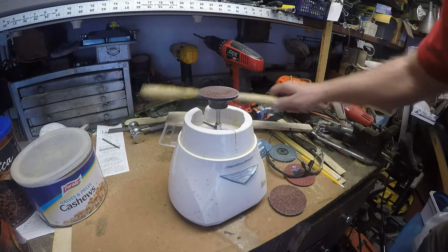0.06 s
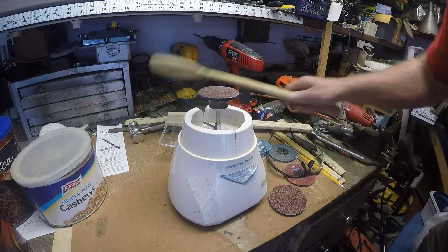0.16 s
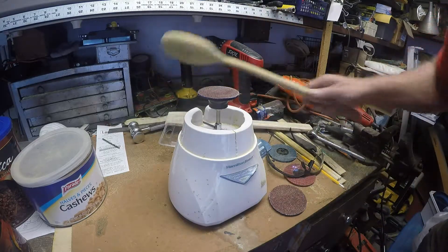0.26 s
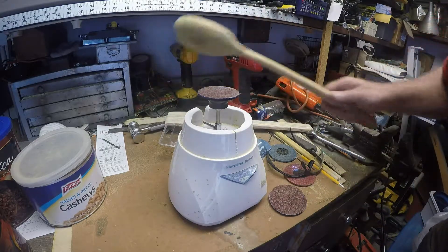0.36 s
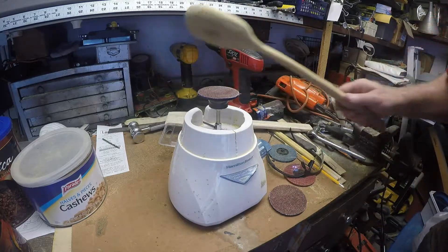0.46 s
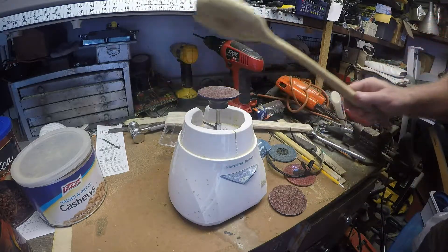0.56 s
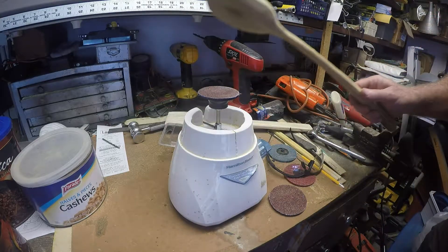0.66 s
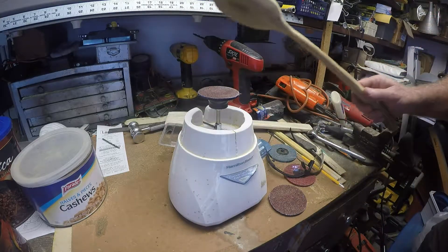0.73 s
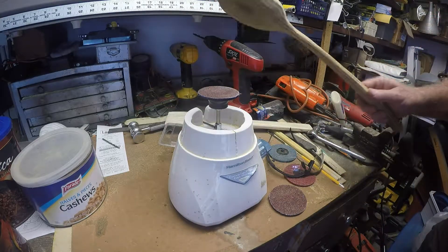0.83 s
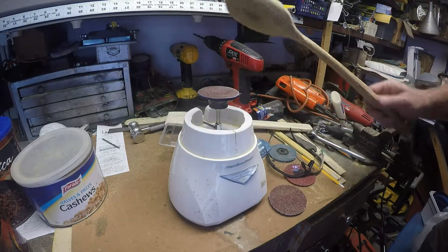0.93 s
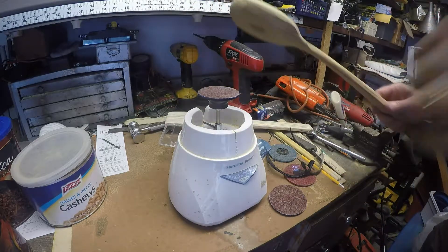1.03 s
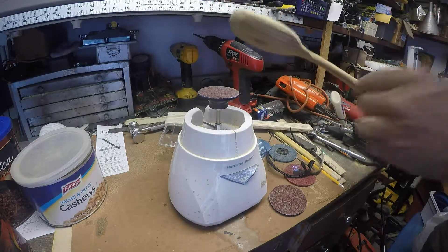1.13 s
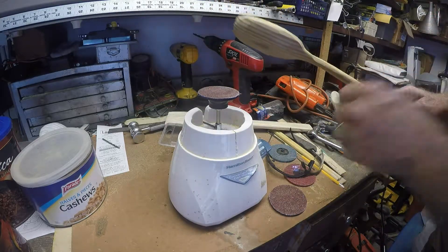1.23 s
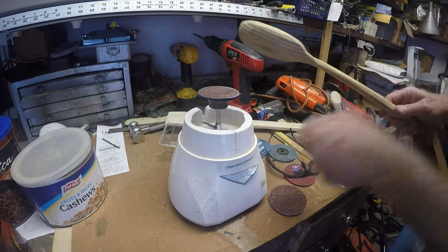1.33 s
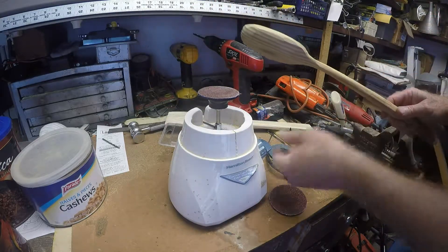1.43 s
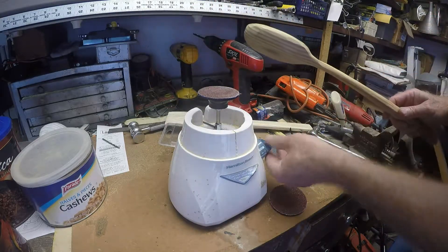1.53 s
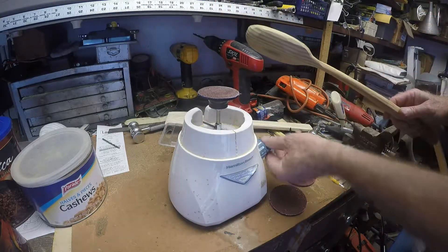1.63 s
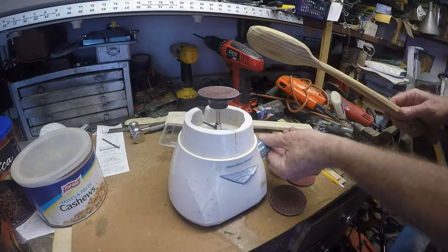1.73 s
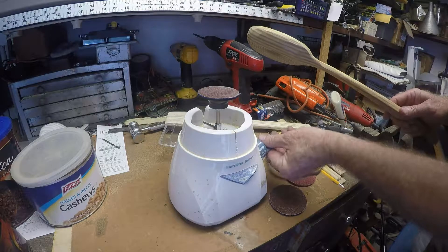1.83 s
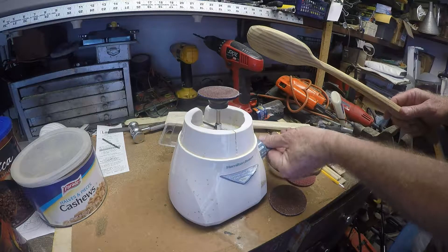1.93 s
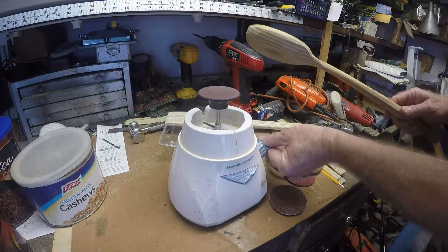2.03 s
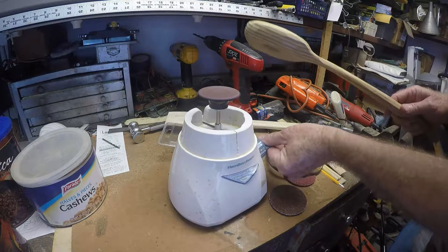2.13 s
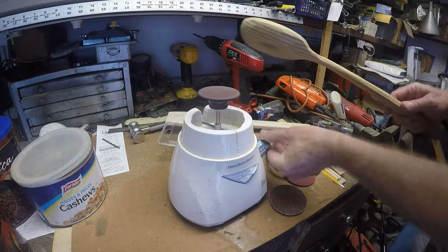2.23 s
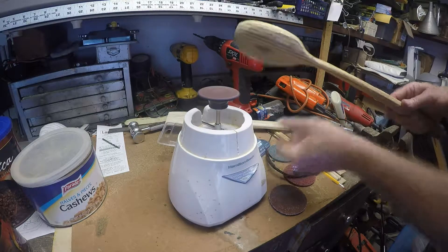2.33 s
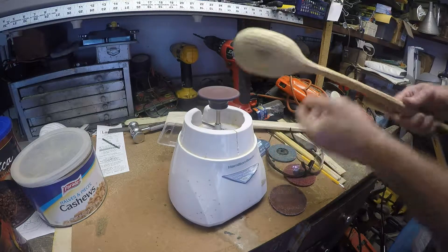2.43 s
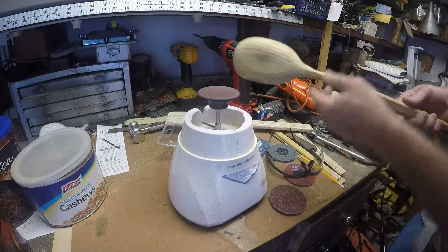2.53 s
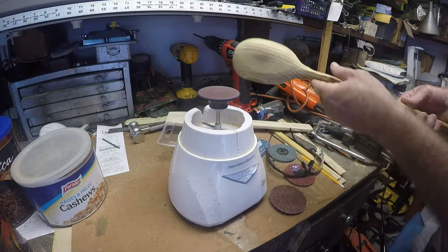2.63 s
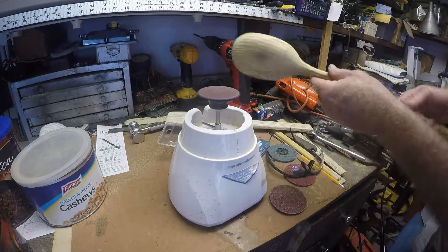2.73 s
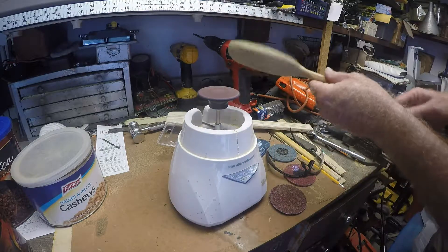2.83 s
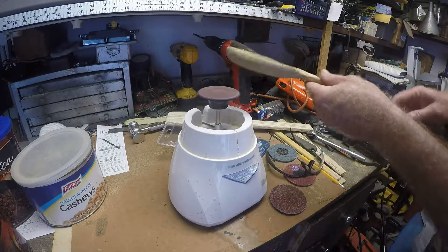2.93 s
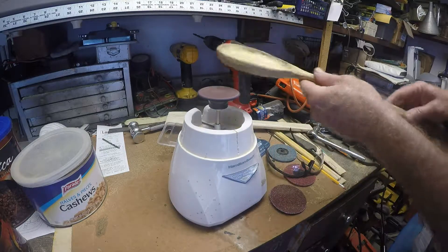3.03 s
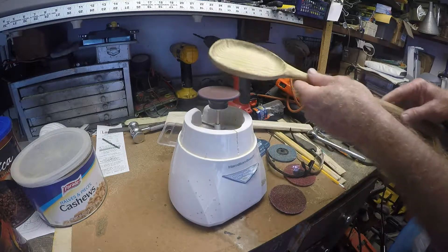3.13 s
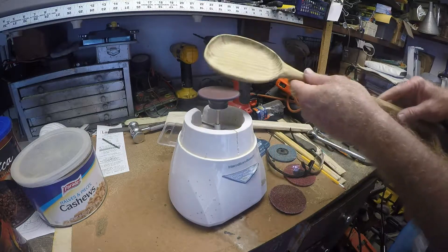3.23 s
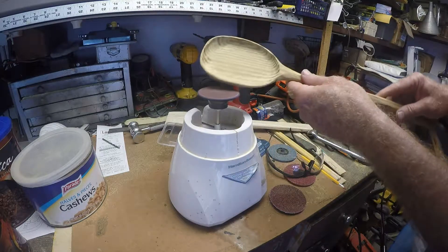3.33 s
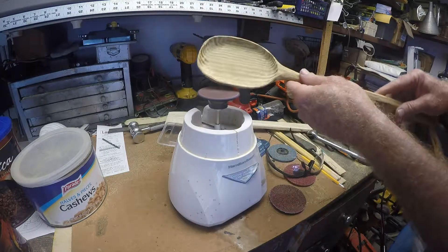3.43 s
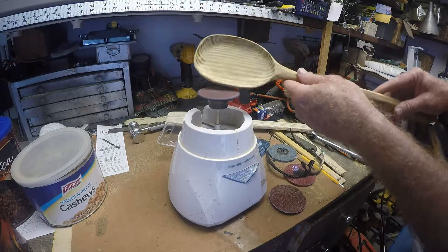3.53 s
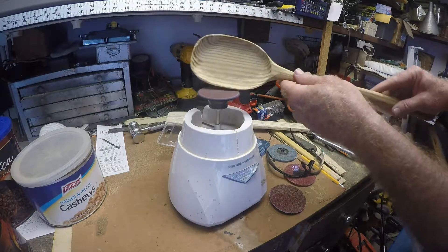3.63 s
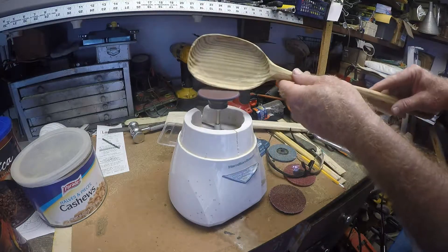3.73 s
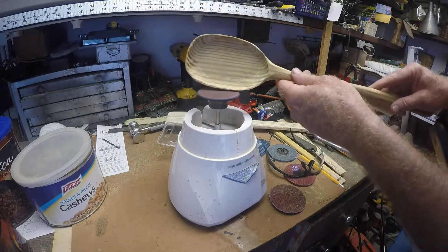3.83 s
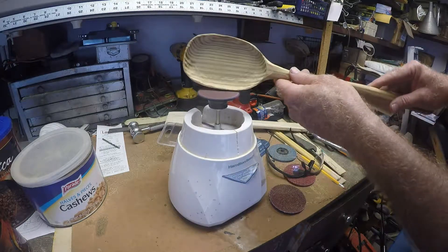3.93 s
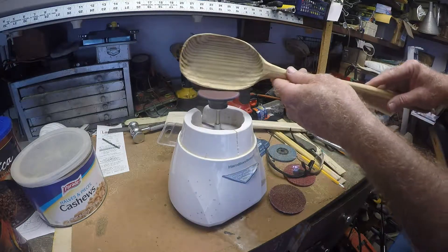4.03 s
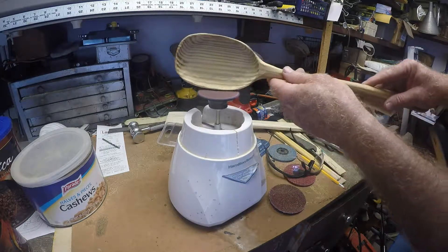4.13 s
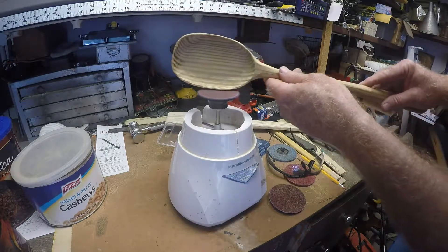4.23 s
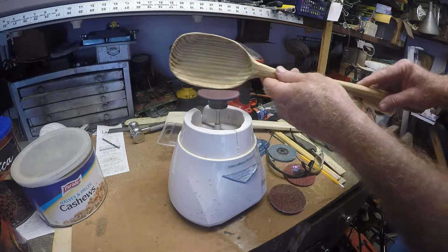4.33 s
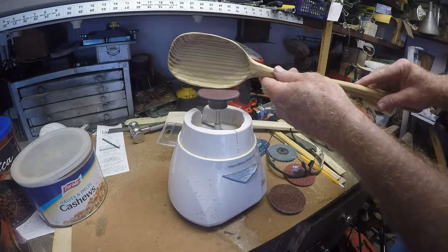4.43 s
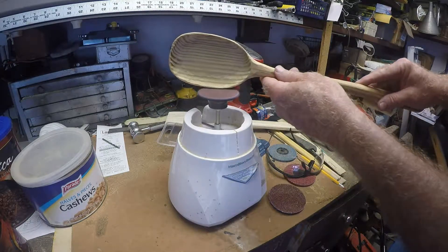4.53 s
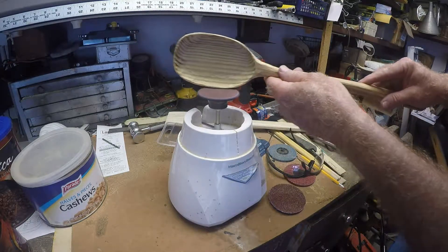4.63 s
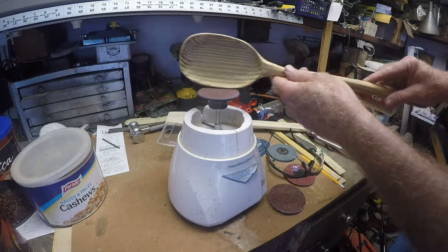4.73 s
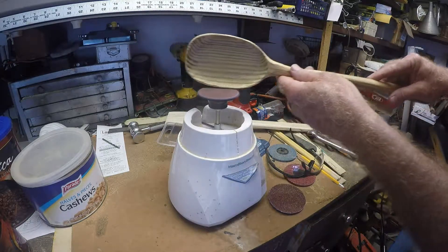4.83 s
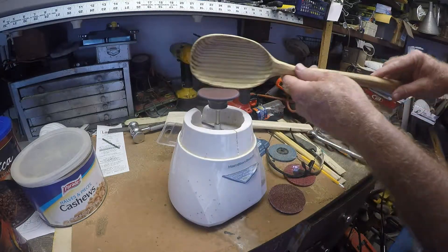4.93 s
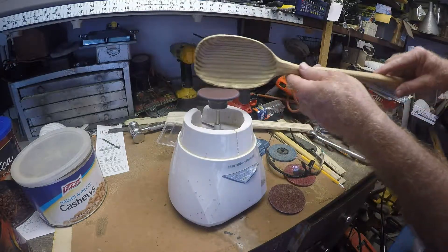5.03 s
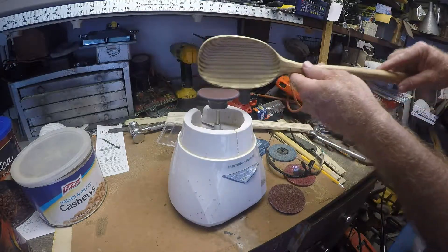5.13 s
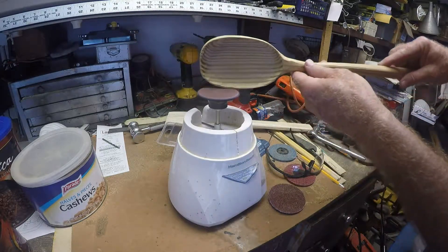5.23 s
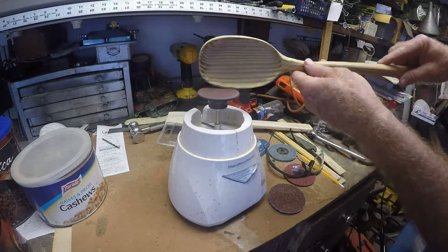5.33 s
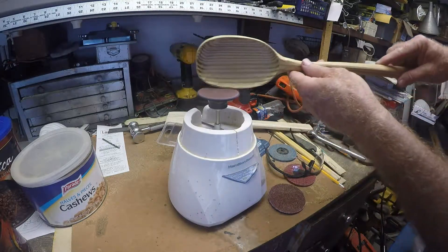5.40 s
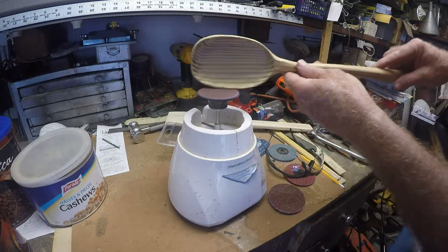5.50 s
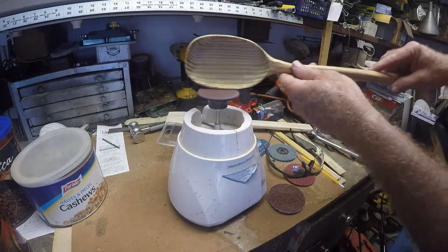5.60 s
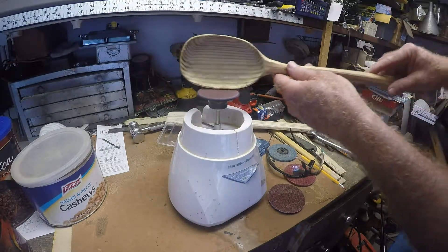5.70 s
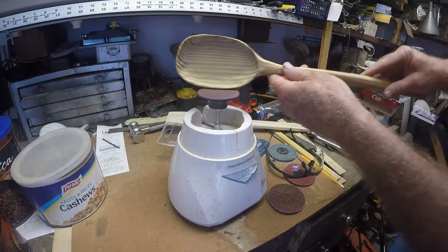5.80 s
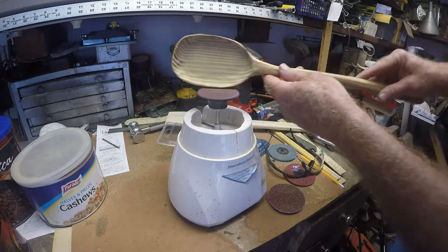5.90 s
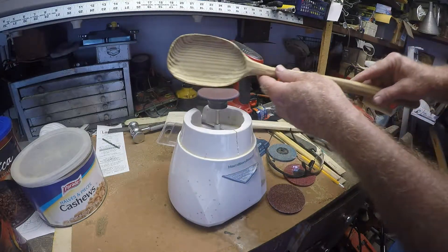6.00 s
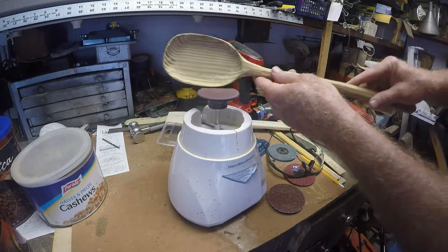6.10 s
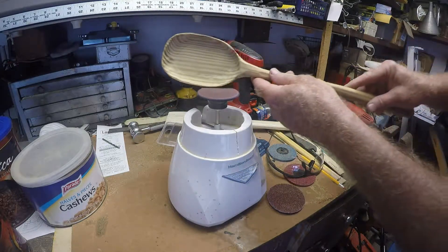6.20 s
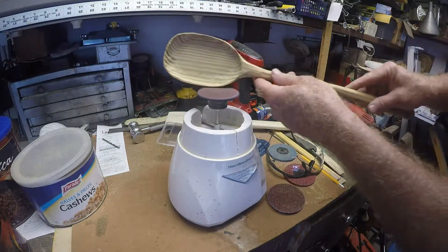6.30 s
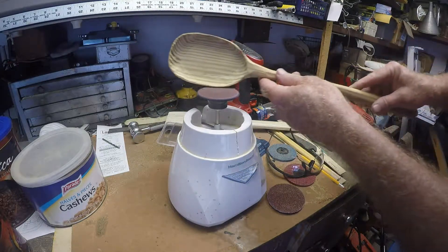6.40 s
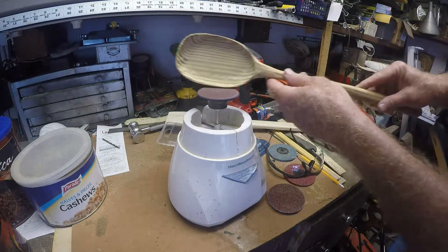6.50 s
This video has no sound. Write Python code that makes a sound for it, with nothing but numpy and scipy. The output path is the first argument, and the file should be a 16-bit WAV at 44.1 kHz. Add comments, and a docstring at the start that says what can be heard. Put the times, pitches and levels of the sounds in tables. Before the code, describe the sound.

A quiet workshop with faint low hum for two seconds. A switch clicks and crackles, and a small brush motor in a hollow plastic base buzzes, knocks on the bench and races up in pitch to a loud steady whir. Later a wooden spoon touches the spinning disc: gritty rasps and hiss in short pushes, fast chattering bounces and thin squeals, over the slightly slowing motor. Close microphone, small cluttered room, continuing to the end.

```python
"""Blender base as a sanding machine

A blender base with a sanding disc on its shaft is switched on in a small, humming workshop.
Its brush motor, fed with half-wave mains, clicks, buzzes and runs up through the resonances of its plastic housing:
tones follow the shaft speed, and shaped noise makes the brushes and the rumble.
A wooden spoon held lightly to the disc rasps with every turn (a repeating track of grit), bounces and squeals."""
import sys
import numpy as np
from scipy import signal
from scipy.fft import rfft, irfft
from scipy.io import wavfile
from scipy.ndimage import map_coordinates

SR = 44100
rng = np.random.default_rng(int(sys.argv[2]) if len(sys.argv) > 2 else 0)


def wrap_up_sound(samples):
    """Save the sound to the file named by the first command line argument, as 16-bit audio."""
    columns = np.atleast_2d(samples).T
    # keep every value between -1 and 1, then stretch to whole-number steps
    tamed = np.clip(columns, -1, 1)
    steps = np.round(tamed * 32767).astype(np.int16)
    wavfile.write(sys.argv[1], SR, steps)


N = 289296   # length in samples
TIME = np.arange(N) / SR   # seconds
MAINS_HZ = 60
CUTOFF_HZ = 15300   # nearly nothing is left above this
SWITCH_ON_S = 1.98

# All levels in the tables are relative, within their own layer.
# Run-up, a quick surge plus a slow creep: (speed gained/turns per s, time constant/s)
RUN_UP = [(77.1, .1425), (130.75, .4125)]
# How hard the spoon brakes the disc: (t/s, speed lost/turns per s)
LOAD = [(3.55, 0), (3.87, 2.1), (4.15, 2.0), (4.4, 2.7), (4.92, 4.7), (5.17, 5.4), (5.39, 3.9), (5.62, 8.4),
        (5.8, 6.6), (5.95, 7.1), (6.08, 6.7), (6.3, 7.7), (6.56, 7.9)]

# Unbalance tones and their mains side tones: (multiple of shaft speed, multiple of mains added, level/dB)
UNBALANCE_TONES = [(1, 0, -18.5), (2, 0, -16), (3, 0, -19.5), (4, 0, -24.5), (5, 0, -34), (6, 0, -30),
                   (1, -1, -35), (1, 1, -30.5), (1, 2, -33), (2, -2, -28.5), (2, -1, -36.5), (2, 1, -26.5)]
# How the base passes the unbalance tones on: (f/Hz, gain/dB)
BASE_RESPONSE = [(60, -1), (100, 2.5), (120, 1.5), (138, -6.5), (185, -7.5), (205, -9), (255, -3.5),
                 (295, -19.5), (335, 2), (365, 6), (390, 0), (408, -6.5), (500, -11.5), (610, -15.5),
                 (700, -19), (820, -15)]
# Whine of fan blades, slots and commutator: (multiple of shaft speed, level/dB)
WHINE_TONES = [(10, -31.5), (20, -36), (24, -37), (36, -41), (48, -42)]
# How the plastic shell passes the whine on: (f/Hz, gain/dB)
SHELL_RESPONSE = [(1400, -14), (1800, -12), (1950, -6), (2050, 1), (2300, -32), (3900, -10), (4300, 2),
                  (4600, 0), (4800, 2), (4950, -2), (5700, -1), (6100, 4), (6600, -2), (7050, -3.5),
                  (7350, -13), (7700, -8), (9000, -18)]
SHAFT_JITTER_TURNS = .0033   # typical size of the uneven turning
STEADYING_DB = -.5   # the spoon's weight calms the once-a-turn wobble: dB per turn per s lost

# Partials of the buzzing iron: (multiple of mains, level/dB)
BUZZ_PARTIALS = [(1, -19), (2, -11), (3, -15), (6, -14)]
# Buzz gain of the starting current, the power by which it fades, its build-up
BUZZ_DB, BUZZ_POWER, BUZZ_ATTACK_S = -14, 1.12, 0.057
BUZZ_LOAD_DB = -49.5   # buzz gain for each turn per s lost to the spoon

# Colour of the brush noise: (f/Hz, density/dB)
BRUSH_COLOUR = [(500, -14), (750, -13), (1100, -8), (1600, -1.5), (2150, 1.5), (2520, 0), (3050, 0),
                (3300, -2), (3800, 0), (4100, -5), (4700, 0.5), (5300, -8.5), (6200, -6.5), (8000, -19),
                (10000, -22.5), (15000, -26)]
# Shell modes that the brushes set ringing: (f/Hz, width/Hz, level/dB)
BRUSH_MODES = [(1988, 120, -15), (2890, 210, -10)]
# Brushes and cooling air: gain at rest and at full speed, and the power of speed by which it grows
BRUSH_STALL_DB, BRUSH_DB, BRUSH_POWER = -44, -23, 1.93
BRUSH_FLUTTER_DB = 3   # how much each mode flutters

# Colour of the housing's rumble: (f/Hz, density/dB)
RUMBLE_COLOUR = [(25, -22), (60, -13), (135, -15), (190, -12.5), (240, -8), (310, -9), (350, 3), (375, 4.5),
                 (430, -10), (485, -2), (560, -15), (800, -18.5), (1800, -24)]
# Rumble gain without rocking or load, its growth as a power of speed, and dB per turn per s lost
RUMBLE_DB, RUMBLE_POWER, RUMBLE_LOAD_DB = -28, 0.2, 0.2
# The base rocks on its feet near one shaft speed: turns per s, half width of the peak, extra gain
ROCKING_HZ, ROCKING_WIDTH_HZ, ROCKING_DB = 143.5, 14.4, 11.5

# Switch contacts and first sparks: (t/s, level/dB)
CLICKS = [(1.993, -28), (2.011, -18), (2.027, -14.5), (2.044, -20), (2.063, -18), (2.112, -25),
          (2.128, -19.5)]
# Modes of the plastic shell that ring with the clicks: (f/Hz, width/Hz, level/dB)
CLICK_MODES = [(1110, 320, -0.5), (1830, 100, 5), (2720, 360, 0.5), (3730, 290, -0.5), (4700, 360, -0.5)]
# The base knocks on the bench while the rotor gathers speed: (t/s, level/dB)
KNOCKS = [(2.141, -8.5), (2.19, -15), (2.318, -18)]
# Modes of the bench that ring with the knocks: (f/Hz, width/Hz, level/dB)
KNOCK_MODES = [(470, 63, 1), (650, 82, 3), (905, 120, -6), (1054, 36, -2), (1800, 160, -2)]

# Pushes of the spoon onto the disc: (start t/s, rise/s, length/s, bite level/dB)
STROKES = [(3.621, .026, .049, -38.5), (3.716, .048, 0.16, -34.5), (3.863, .049, 0.21, -40),
           (4.037, .079, 0.086, -39), (4.263, 0.094, 0.14, -37), (4.397, .03, 0.25, -39),
           (4.684, 0.044, 0.22, -37), (4.9, 0.071, 0.24, -39.5), (5.319, 0.17, 0.31, -33),
           (5.71, .04, 0.25, -43.5), (5.903, 0.22, 0.48, -43.5), (6.48, .075, .1, -38.5)]
RELEASE_S, RESTING_DB = 0.039, -44.5   # between strokes the bite dies back to that of the resting spoon
# Colour of the wood's rasp: (f/Hz, density/dB)
RASP_COLOUR = [(900, -30), (1500, 4.5), (2600, -23), (3550, 9), (4200, -2.5), (4900, 1), (5550, 4),
               (6250, 5), (6800, -9), (7300, -0.5), (8600, -8.5), (11000, -37)]
# Colour of the grit's hiss: (f/Hz, density/dB)
GRIT_COLOUR = [(5000, -2), (6850, 5), (8200, 3.5), (9100, 5), (9700, 6.5), (10700, -1), (11700, 6.5),
               (12300, 4), (13100, -1), (14000, 5), (15400, -5)]
# Spots of wood that each ring at their own pitch: (middle t/s, length/s, f/Hz, level/dB)
WOOD_RINGS = [(3.67, 0.08, 5000, -26), (3.83, .12, 13800, -40), (4.03, 0.2, 7700, -39),
              (4.09, 0.15, 9830, -38), (4.4, .18, 13650, -41), (4.36, .09, 8500, -38),
              (4.75, 0.078, 6150, -27), (4.83, 0.19, 4400, -30), (4.85, 0.2, 8000, -37),
              (4.84, 0.15, 12000, -40), (5.08, .17, 7650, -43), (5.6, .22, 14000, -38.5),
              (5.57, .1, 5100, -29), (5.53, .15, 7400, -32), (5.55, 0.1, 12850, -32),
              (6.16, 0.37, 12160, -40.5), (6.13, 0.24, 14600, -36.5)]
RING_WIDTH_SHARE = .075   # width of each filter as a share of the ring's pitch
SNAGS_PER_S = 65   # coarse grains that catch in the wood

# Bouts of bouncing: (start t/s, length/s, first rate/hops per s, last rate/hops per s, level/dB)
BOUTS = [(4.316, 0.8, 19.1, 21.4, -26), (5.399, 0.28, 31, 37, -24), (5.719, 0.92, 24.4, 16.4, -27)]
# Modes of the spoon: (f/Hz, width/Hz, level/dB)
SPOON_MODES = [(375, 17, -42), (886, 91, -4), (1090, 126, -3.5), (1500, 37, -26), (1690, 43, 2)]
# A scuff's decay as a share of its hop; rattle between landings; the dying away of a bout
HOP_DECAY, RATTLE_SHARE, BOUT_RELEASE_S = 0.27, 0.077, 0.062

# Squeals of a brush (first row), then of the wood: (middle t/s, length/s, multiple of shaft speed, level/dB)
SQUEALS = [(2.356, .02, 36, -32), (3.86, .13, 31, -32), (4.45, .14, 17, -31), (4.65, .9, 8, -38),
           (4.827, .12, 23, -31), (4.93, .42, 24, -27), (4.86, .2, 18, -31), (5.53, .2, 5, -33.5),
           (5.5, .12, 24, -27), (5.58, .1, 25, -28), (5.64, .36, 18, -28.5), (6.15, .56, 24, -27.7),
           (6.17, .29, 21, -25.5), (6.36, .14, 31, -33)]

# Steady hum in the workshop: (f/Hz, level/dB)
HUM = [(75.4, -40.5), (150.7, -54.5), (226.1, -50), (301.5, -62), (452.2, -47.5), (678.3, -60)]
# Colour of the room noise: (f/Hz, density/dB)
ROOM_COLOUR = [(12, -36), (20, -2.5), (49, -12.5), (80, -1.5), (97, -11.5), (155, -8), (183, -13.5),
               (229, -9.5), (398, -12), (457, -11.5), (555, -17.5), (603, -16), (774, -22), (1300, -24.5),
               (2000, -27), (2800, -29.5), (3600, -35), (5100, -35), (6600, -39.5), (9000, -50),
               (15000, -59)]
ROOM_DB = -41


def shaft_speed(load):
    """Turns per second: the motor closes in on its free speed, less what the spoon takes."""
    age = np.maximum(TIME - SWITCH_ON_S, 0)
    return sum(gain * (1 - np.exp(-age / lag_s)) for gain, lag_s in RUN_UP) - load


def rotor(speed, spin, turns, load):
    """Shaft tones grow with speed and swell as they cross the resonances of base and shell."""
    late_speed = np.interp(TIME - .025, TIME, speed)   # resonances take a moment to build up
    low = 0
    for multiple, side, db in UNBALANCE_TONES:
        side_hz = side * MAINS_HZ
        steadying_db = (multiple == 1) * STEADYING_DB * load
        gain = from_db(db + .5 * drift(15) + steadying_db) * spin ** (0.43 * multiple)
        passed_on = response(BASE_RESPONSE, multiple * late_speed + side_hz)
        low = low + gain * passed_on * tone(multiple * turns + side_hz * TIME)
    jitter = SHAFT_JITTER_TURNS * drift(29)   # uneven turning blurs the high partials
    high = 0
    for multiple, db in WHINE_TONES:
        gain = from_db(db + 2.15 * drift(9.4)) * response(SHELL_RESPONSE, multiple * speed)
        high = high + gain * tone(multiple * (turns + jitter))
    high = high * from_db(1.3 * drift(56))   # the brushes grip unevenly
    onset = np.clip(speed / 115, 0, 1) ** 4   # a slow rotor hardly shakes anything
    return onset * (low + high * throb(MAINS_HZ * TIME, depth=0.054))


def windings(spin, load):
    """The iron buzzes with the current, which falls as the rotor gains speed and returns under load."""
    build_up = np.clip((TIME - SWITCH_ON_S) / BUZZ_ATTACK_S, 0, 1)
    inrush = build_up * np.maximum(1 - spin, 0) ** BUZZ_POWER
    buzz = sum(from_db(db + 0.5 * drift(22)) * tone(k * MAINS_HZ * TIME) for k, db in BUZZ_PARTIALS)
    return (from_db(BUZZ_DB) * inrush + from_db(BUZZ_LOAD_DB) * load) * buzz


def brushes(spin, turns):
    """Brushes scratch on the commutator, louder with speed; the shell rings fitfully with them."""
    sparks = noise() * from_db(1.5 * drift(1400) + 0.96 * drift(62))
    # uneven over the turn and over the mains cycle
    sparks = sparks * throb(3 * turns, depth=0.15) * throb(MAINS_HZ * TIME, depth=0.033)
    rings = 0
    for hz, width_hz, db in BRUSH_MODES:
        flutter = from_db(db + BRUSH_FLUTTER_DB * drift(35))
        rings = rings + flutter * rms_one(resonance(sparks, hz, width_hz))
    gain = np.hypot(from_db(BRUSH_STALL_DB), from_db(BRUSH_DB) * spin ** BRUSH_POWER)
    running = TIME > CLICKS[0][0]
    return gain * running * (coloured(sparks, BRUSH_COLOUR) + rings)


def housing(speed, spin, load):
    """The hollow base rumbles on its feet, most while the shaft passes their resonance."""
    rocking_db = ROCKING_DB / (1 + ((speed - ROCKING_HZ) / ROCKING_WIDTH_HZ) ** 2)
    gain = from_db(RUMBLE_DB + rocking_db + RUMBLE_LOAD_DB * load) * spin ** RUMBLE_POWER
    running = TIME > CLICKS[0][0]
    return gain * running * coloured(noise(), RUMBLE_COLOUR)


def clicks():
    """The switch cracks in the shell, and the base knocks on its rubber feet, ringing the bench."""
    contacts = softened(blows(CLICKS, chatter=0.21, decay_s=0.0054), cut_hz=8200)
    thuds = softened(blows(KNOCKS, chatter=0.042, decay_s=0.01), cut_hz=1700)
    return from_db(17.5) * body(contacts, CLICK_MODES) + from_db(29.0) * body(thuds, KNOCK_MODES)


def sanding(turns):
    """The disc, slightly out of true, bites once a turn; wood rasps and rings, grit hisses and snags."""
    contact = throb(turns, depth=0.24) * throb(2 * turns, depth=0.13)
    snags = rms_one((rng.random(N) < SNAGS_PER_S / SR) * rng.uniform(.5, 1, N))
    scrape = contact * grit_track(turns, memory_turns=43, loose=0.89) + 0.2 * snags
    grit = contact * grit_track(turns, memory_turns=10, loose=0.5)
    grit = grit * from_db(1.5 * drift(1500)) + 0.25 * snags
    bite = from_db(RESTING_DB) * (TIME > STROKES[0][0])
    for start_s, rise_s, length_s, db in STROKES:
        bite = np.hypot(bite, from_db(db) * swell(start_s, rise_s, length_s, RELEASE_S))
    rings = 0
    for middle_s, length_s, hz, db in WOOD_RINGS:
        width_hz = hz * RING_WIDTH_SHARE
        ring = resonance(resonance(grit, hz, width_hz), hz, width_hz)
        rings = rings + from_db(db) * arch(middle_s, length_s) * rms_one(ring)
    rasp = from_db(5.5) * bite ** 0.84 * coloured(scrape, RASP_COLOUR)
    hiss = from_db(3.5) * bite * coloured(grit, GRIT_COLOUR)
    return (rasp + rings + hiss) * from_db(1.06 * drift(60))


def grit_track(turns, memory_turns, loose, size=220):
    """The same ring of grains passes under the wood every turn and slowly changes as the spoon moves."""
    shape = (int(turns[-1]) + 2, size)   # one row of grains for each turn
    keep = np.exp(-1 / memory_turns)
    ring = signal.lfilter([1], [1, -keep], rng.standard_normal(shape), axis=0)
    passing = rms_one(map_coordinates(ring.ravel(), [turns * size], order=3))
    return passing + loose * noise()   # torn fibres and dust never repeat


def bouncing(turns):
    """The spoon hops on the disc in bouts; each landing is a short scuff of grit that rings its modes."""
    landings = 0
    for start_s, length_s, first_rate, last_rate, db in BOUTS:
        rate = np.interp(TIME, [start_s, start_s + length_s], [first_rate, last_rate])
        rate = rate * from_db(0.17 * drift(3.8))
        hops = np.cumsum(rate * (TIME > start_s)) / SR
        scuffs = RATTLE_SHARE + np.exp(-(hops % 1) / HOP_DECAY)
        bout = swell(start_s, 0.0054, length_s, BOUT_RELEASE_S)
        landings = landings + from_db(db) * bout * scuffs
    scuffed_grit = landings * grit_track(turns, memory_turns=2.5, loose=1.0)
    return from_db(17.5) * body(scuffed_grit, SPOON_MODES)


def squeal(turns):
    """Stick and slip lock briefly to multiples of the shaft speed, with a fine tremble."""
    out = np.zeros(N)
    for middle_s, length_s, multiple, db in SQUEALS:
        line = from_db(2.3 * drift(35)) * tone(multiple * turns + .06 * drift(22))
        out += from_db(db) * arch(middle_s, length_s) * line
    return out


def workshop():
    """Room noise and the hum of a fan somewhere, made of slightly wavering tones."""
    hum = 0
    for hz, db in HUM:
        hum = hum + from_db(db + 2.8 * drift(33)) * tone(hz * TIME + 0.0092 * drift(3.6))
    return hum + from_db(ROOM_DB) * coloured(noise(), ROOM_COLOUR)


def blows(rows, chatter, decay_s):
    """Each blow is one sharp contact and a short burst of chatter after it."""
    out = np.zeros(N)
    for start_s, db in rows:
        age = np.maximum(TIME - start_s, 0)
        out += from_db(db) * chatter * noise() * (age > 0) * np.exp(-age / decay_s)
        out[int(start_s * SR)] += from_db(db)
    return out


def softened(x, cut_hz):
    """A yielding contact has little treble."""
    return signal.sosfilt(signal.butter(2, cut_hz, fs=SR, output="sos"), x + 1e-18)


def body(x, modes):
    """A struck object rings at several pitches: parallel resonances with alternating signs."""
    out = 0
    for k, (hz, width_hz, db) in enumerate(modes):
        out = out + (-1) ** k * from_db(db) * resonance(x, hz, width_hz)
    return out


def resonance(x, hz, width_hz):
    """Two-pole band-pass with gain near 1 on top; a narrow one rings longer."""
    r = np.exp(-np.pi * width_hz / SR)
    feed = np.array([1, 0, -1]) * (1 - r * r) / 2
    feedback = [1, -2 * r * np.cos(2 * np.pi * hz / SR), r * r]
    return signal.lfilter(feed, feedback, x + 1e-18)


def swell(start_s, rise_s, length_s, release_s):
    """A smooth rise, a hold, and an exponential release."""
    age = TIME - start_s
    rise = np.sin(np.pi / 2 * np.clip(age / rise_s, 0, 1)) ** 2
    return rise * np.exp(-np.maximum(age - length_s, 0) / release_s)


def arch(middle_s, length_s):
    """A rounded rise and fall."""
    return np.exp(-np.abs(2 * (TIME - middle_s) / length_s) ** 3 / 2)


def throb(cycles, depth):
    """A swell once a cycle; unit power."""
    return rms_one(np.exp(depth * np.cos(2 * np.pi * cycles)))


def tone(cycles):
    """A sine of unit power that starts anywhere in its cycle."""
    return np.sqrt(2) * np.sin(2 * np.pi * (cycles + rng.random()))


def noise():
    """White noise."""
    return rng.standard_normal(N)


def drift(rate_hz):
    """Random wandering of spread 1, mostly slower than the given rate."""
    hz = np.arange(N // 2 + 1) * SR / N
    return rms_one(irfft(rfft(noise()) / (1 + (hz / rate_hz) ** 2), N))


def coloured(x, points):
    """A steady sound given a spectrum that falls steeply beyond its ends; unit power."""
    hz = np.maximum(np.arange(N // 2 + 1) * SR / N, 1)
    skirts = np.minimum(1, np.minimum(hz / points[0][0], points[-1][0] / hz)) ** 3
    return rms_one(irfft(rfft(x) * response(points, hz) * skirts, N))


def response(points, hz):
    """Gain of a spectrum at the given frequencies, joined by straight lines over log frequency."""
    points = np.array(points)
    return from_db(np.interp(np.log(np.maximum(hz, 1)), np.log(points[:, 0]), points[:, 1]))


def in_time(rows):
    """A curve at every sample."""
    return np.interp(TIME, *np.transpose(rows))


def rms_one(x):
    """Scale to unit power."""
    return x / np.sqrt(np.mean(x ** 2) + 1e-20)


def from_db(db):
    """Decibels to gain."""
    return 10 ** (np.asarray(db) / 20)


def scene():
    """Motor, spoon and workshop, the same on both channels."""
    load = in_time(LOAD)
    speed = shaft_speed(load)
    spin = speed / sum(gain for gain, _ in RUN_UP)   # share of the free speed
    turns = np.cumsum(speed) / SR
    motor = rotor(speed, spin, turns, load) + windings(spin, load) + brushes(spin, turns)
    motor = motor + housing(speed, spin, load) + clicks()
    spoon = sanding(turns) + bouncing(turns) + squeal(turns)
    return np.tile(motor + spoon + workshop(), (2, 1))


def record(dry):
    """The top is cut steeply."""
    return signal.sosfilt(signal.ellip(12, .1, 80, CUTOFF_HZ, fs=SR, output="sos"), dry)


dry = scene()
out = record(dry)
wrap_up_sound(out)
```